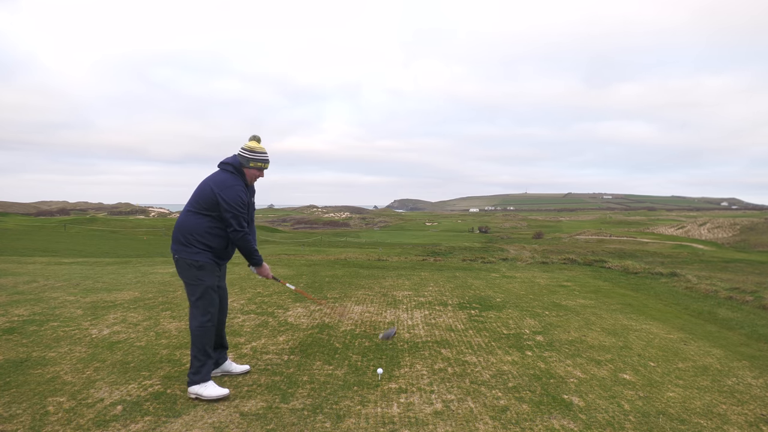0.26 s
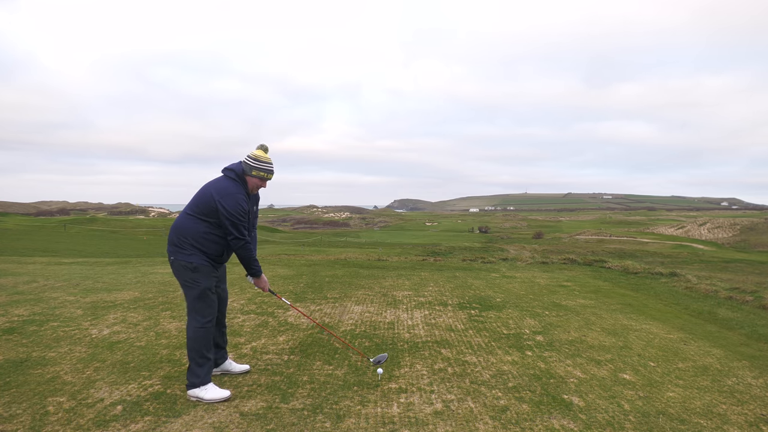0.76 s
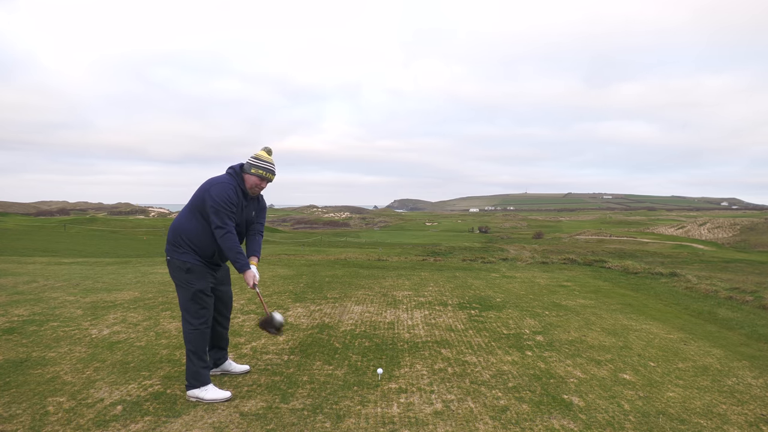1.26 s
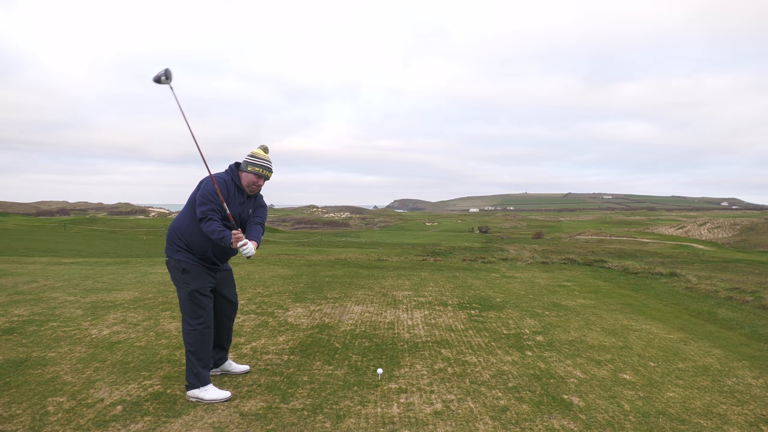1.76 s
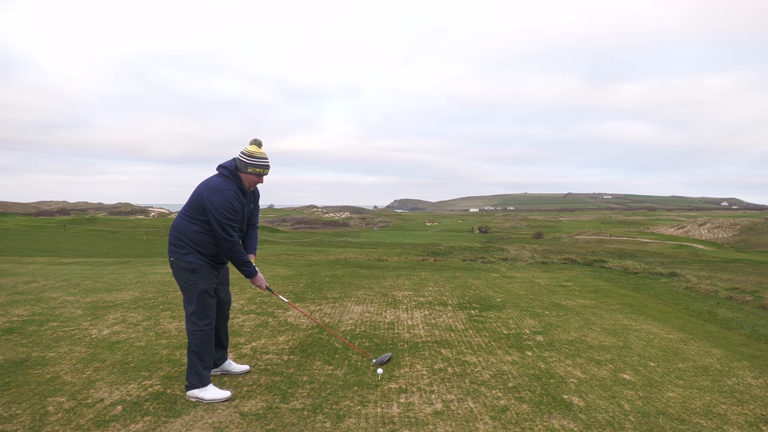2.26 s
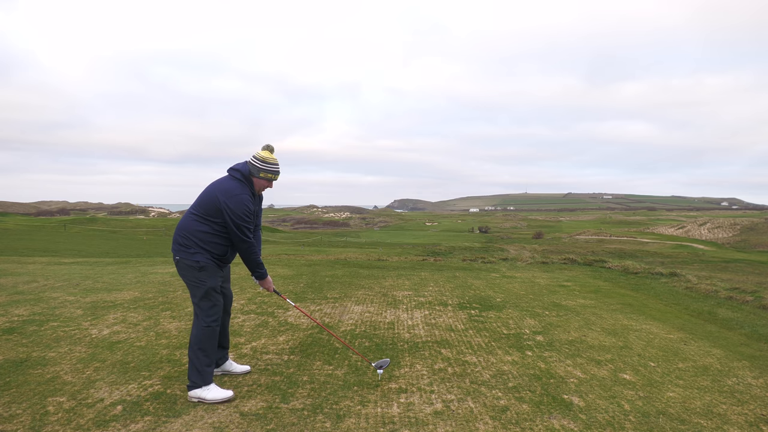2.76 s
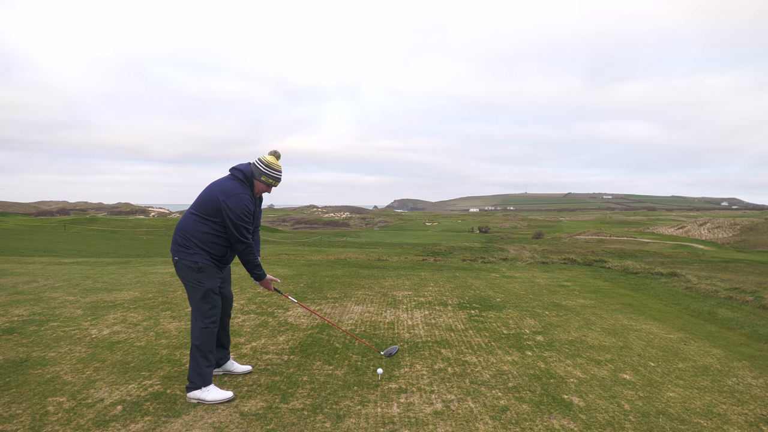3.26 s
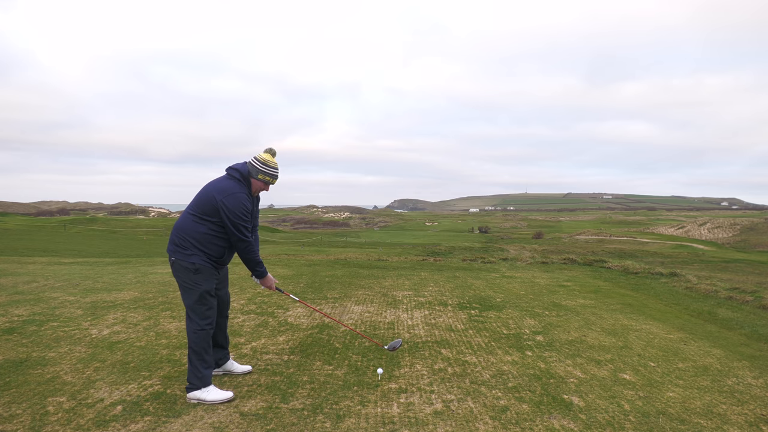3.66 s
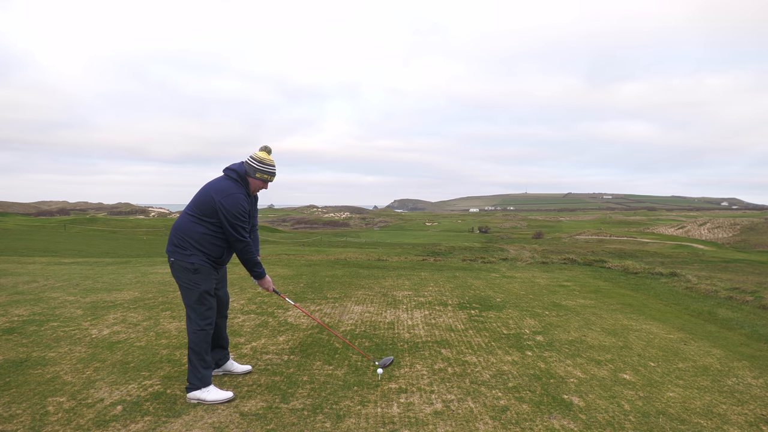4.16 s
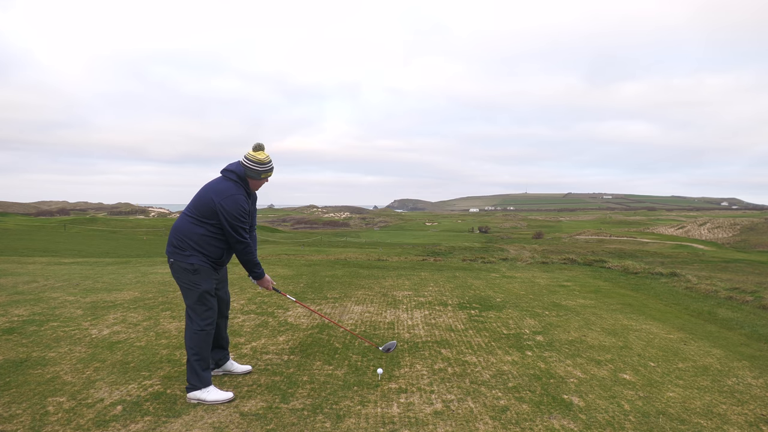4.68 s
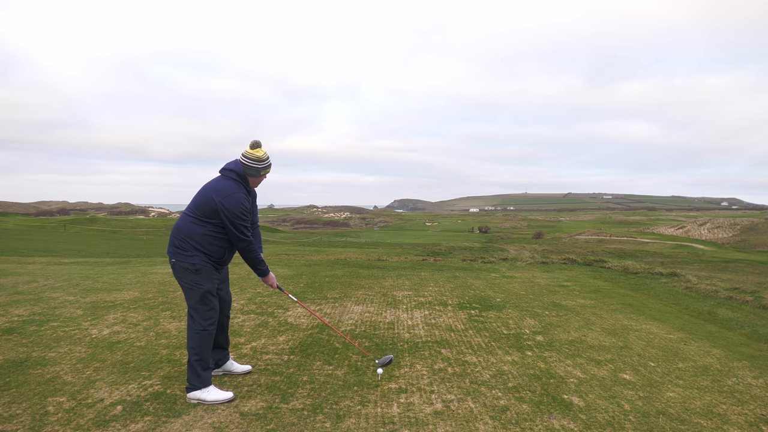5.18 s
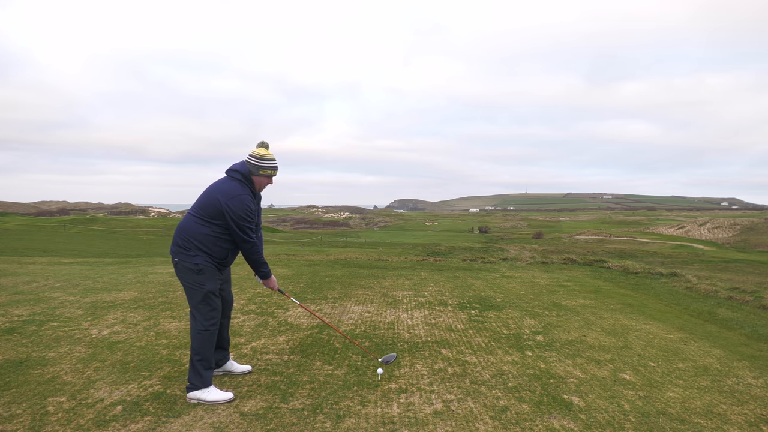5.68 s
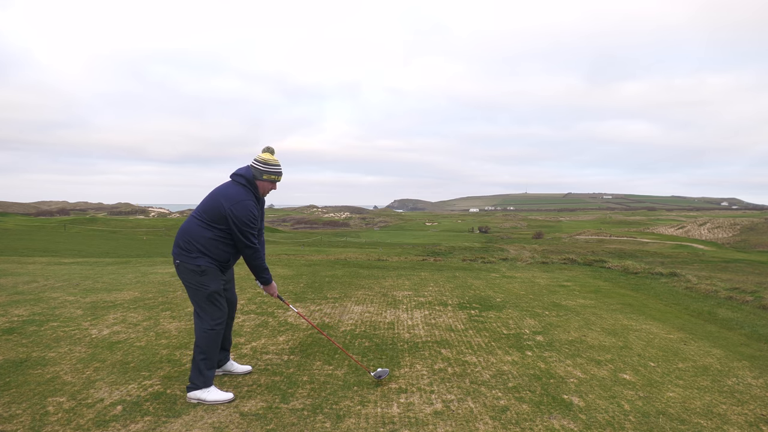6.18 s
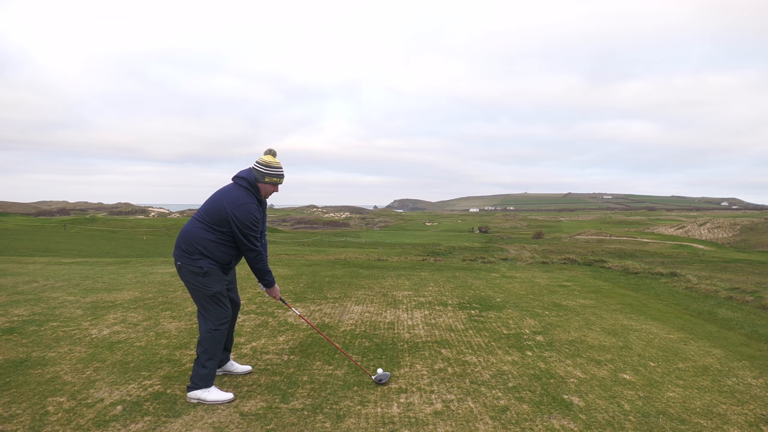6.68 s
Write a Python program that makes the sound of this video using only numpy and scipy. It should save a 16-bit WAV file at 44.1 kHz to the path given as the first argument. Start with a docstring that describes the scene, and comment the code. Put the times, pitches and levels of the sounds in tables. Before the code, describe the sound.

A golfer's jacket brushes softly in light wind, with puffs thumping gently on the microphone and grass hissing. Tiny clicks and brief high whistles of birds dot the quiet. Just before three seconds, after a stronger sleeve swish, the club hits the ball with a single dry metallic snap that dies almost at once, with a faint scatter off the ground. Then the calm wind returns with a few ticks and rubs. Open-air, centred mono pickup with light constant hiss.

```python
"""Golf drive on an open links tee

A driver hits the ball with one dry crack: damped modes of the hollow head, a low shove and ground scatter.
A jacket swishes as enveloped noise, gear ticks as short impulse responses, and birds chirp as gliding sines.
Shaped noise makes the light wind, which rumbles on one microphone and hisses in the grass,
a faint distant skylark song, and the steady self noise of the microphone."""
import sys
import numpy as np
from scipy import signal
from scipy.fft import rfft, irfft, next_fast_len
from scipy.io import wavfile
from scipy.ndimage import uniform_filter1d, map_coordinates

SR = 44100
rng = np.random.default_rng(int(sys.argv[2]) if len(sys.argv) > 2 else 0)


def int16_out(signal):
    """Quantize to a 16-bit WAV file."""
    q = np.round(np.clip(np.atleast_2d(signal).T, -1, 1) * 32767)
    wavfile.write(sys.argv[1], SR, q.astype(np.int16))


N = 305613  # length in samples
TIME = np.arange(N) / SR  # seconds


def amp(db):
    """Amplitude ratio of a level in decibels: 20 dB is a factor of ten."""
    return 10 ** (np.asarray(db) / 20)


def unit(x):
    """Scale to an rms of 1, so that a later gain sets the effective level."""
    return x / np.sqrt(np.mean(x ** 2) + 1e-20)


def curve(rows):
    """Linear interpolation of (time_s, value) rows, one value per sample."""
    return np.interp(TIME, *np.transpose(rows))


def wobble(rate_hz):
    """Slow random modulation: a smooth spline through rate_hz random knots a second."""
    knots = rng.standard_normal(int(N * rate_hz / SR) + 4)
    return map_coordinates(knots, [TIME * rate_hz])


def gains(points, size):
    """Frequency response from (frequency_hz, level_db) points, interpolated over log frequency."""
    hz, db = np.transpose(points)
    bin_hz = np.fft.rfftfreq(size, 1 / SR)
    return amp(np.interp(np.log(bin_hz + 1), np.log(hz), db))


def noise(spectrum):
    """Coloured noise of rms 1: white noise filtered by multiplication in the frequency domain."""
    size = next_fast_len(N + 8192)
    white = rng.standard_normal(size)
    coloured = irfft(rfft(white) * gains(spectrum, size), size)
    return unit(coloured[:N])


def patchy(x, depth_db):
    """Random spectral modulation: patches of the spectrum rise and fall; the result has rms 1."""
    bins = signal.stft(x, nperseg=512)[2]
    field = rng.standard_normal(bins.shape)
    field = uniform_filter1d(field, size=6, axis=0)  # smooth over frequency
    field = uniform_filter1d(field, size=12, axis=1)  # smooth over time
    modulated = signal.istft(bins * amp(depth_db * unit(field)), nperseg=512)[1]
    return unit(modulated[:N])


def tap(spectrum, size=512):
    """Minimum-phase impulse response of a spectrum, by folding its cepstrum; the peak is 1."""
    cepstrum = irfft(np.log(gains(spectrum, size)))
    cepstrum[1:size // 2] *= 2
    cepstrum[size // 2 + 1:] = 0
    pulse = irfft(np.exp(rfft(cepstrum)))
    return pulse / np.abs(pulse).max()


def add(track, start_s, sound):
    """Superposition: mix a sound into a track, in place, from start_s."""
    part = track[round(start_s * SR):][:len(sound)]
    part += sound[:len(part)]


def head_ring(t, release_s, peak_db=-17):
    """Modal decay: the face flexes under the squashed ball; its high modes spring up as the ball leaves."""
    # modes of the hollow club head and the ball, levels relative: frequency_hz, level_db, t60_s
    head = [(1230, -7.5, 0.014), (2420, -0.5, 0.011), (3230, -3, 0.008), (3630, -6, 0.013),
            (3820, -17.5, 0.016), (5040, -40, 0.0055), (6250, -30, .012), (6900, -29, 0.0087),
            (8670, -4.5, 0.0019), (10200, -20, .006), (11300, -15.5, 0.0057), (13500, -14, .004)]
    modes = np.array([amp(db - 60 * t / t60) * np.cos(2 * np.pi * hz * t) for hz, db, t60 in head])
    is_low = np.array(head)[:, 0] < 4500
    low = modes[is_low].sum(axis=0)
    high = modes[~is_low].sum(axis=0)
    # the microphone's presence band softens the onset, so the low ring swells over a cycle
    presence = signal.butter(1, [2200, 4200], "bandpass", fs=SR, output="sos")
    ring = signal.sosfilt(presence, low)
    onset = 1 - np.exp(-t / 40e-6)  # time constant in seconds
    add(ring, release_s, amp(-1) * high * onset)
    return ring * amp(peak_db) / np.abs(ring).max()


def strike(strike_s=2.8699, release_s=0.0005, thud_db=-34, scatter_db=-49, scatter_t60_s=0.17):
    """Impact and reflection: the head rings, the squashed ball shoves, and the surroundings answer."""
    # returns from things near the tee, relative to the ring: delay_s, level_db
    echoes = [(.0063, -30), (.0079, -25), (0.022, -23)]
    # spectrum of the squashed ball's shove, relative: frequency_hz, level_db
    thud = [(60, -24), (200, -11), (340, 10.5), (500, 1.5), (750, 8.5), (1000, -18), (1700, 6), (2500, 5),
            (6000, -36)]
    # spectrum sent back by the turf and nearby things, relative per hertz: frequency_hz, level_db
    scatter = [(300, -1), (1000, -4), (1600, -16), (2300, -2), (3000, -11), (3750, 4), (4700, -7),
               (6200, -4.5), (8000, -12), (11000, -11), (15000, -22)]
    t = np.arange(SR // 4) / SR
    ring = head_ring(t, release_s)
    track = np.zeros(N)
    add(track, strike_s, ring)
    for delay_s, db in echoes:
        add(track, strike_s + delay_s, amp(db) * ring)
    # the shove comes just ahead of the ring, with opposite sign
    add(track, strike_s - release_s, -amp(thud_db) * tap(thud))
    # rough ground returns a short diffuse tail
    tail = amp(scatter_db - 60 * t / scatter_t60_s)
    add(track, strike_s, tail * noise(scatter)[:len(t)])
    return track


def jacket(grain_db=2, bounce=0.35, ground_lag_s=0.0023):
    """Sliding friction: nylon on nylon gives a grainy hiss that swells and fades with each stroke."""
    # strokes of sleeve on jacket, rise and fall as Gaussian widths, fizz relative to the body:
    # peak_s, level_db, rise_s, fall_s, fizz_db
    swishes = [(.06, -58, 0.084, 0.19, -15), (.46, -66, .05, 0.028, -2), (.84, -70.5, 0.1, 0.054, 5),
               (1.58, -61.5, 0.15, 0.07, -11), (2.322, -48, .024, 0.041, -15.5),
               (2.45, -66, 0.044, 0.045, -5), (3.33, -67, 0.07, 0.055, 1), (3.87, -57, 0.012, 0.03, -25),
               (5.78, -62, 0.15, 0.077, -27)]
    # body spectrum of the rubbed nylon, relative per hertz: frequency_hz, level_db
    nylon = [(500, -40), (1400, -25), (2000, -23), (2800, -4), (3400, 0.5), (4100, -1.5), (4800, -11.5),
             (6500, -17.5), (8500, -28), (11000, -40), (15000, -50)]
    # spectrum of its brighter fizz, relative per hertz: frequency_hz, level_db
    fizz_spectrum = [(2000, -25), (4500, 5), (6000, 3), (8200, 1), (10000, -4), (15000, -22)]
    body, fizz = np.zeros(N), np.zeros(N)
    for peak_s, db, rise_s, fall_s, fizz_db in swishes:
        width_s = np.where(TIME < peak_s, rise_s, fall_s)
        speed = amp(db) * np.exp(-0.5 * ((TIME - peak_s) / width_s) ** 2)
        body += speed
        fizz += amp(fizz_db) * speed
    hiss = body * noise(nylon) + fizz * noise(fizz_spectrum)
    direct = hiss * unit(amp(grain_db * wobble(400)))
    # the bounce off the turf combs the hiss
    return direct + bounce * np.roll(direct, round(ground_lag_s * SR))


def ticks(rattle=0.14):
    """Impulse excitation: each contact of the gear is one tap with a brief decaying rattle after it."""
    # small ticks of gear, t60 that of the rattle: start_s, body_db, snap_db, snap_hz, t60_s
    contacts = [(0.52, -32, -43, 6200, 0.025), (.5603, -41, -45, 5800, 0.013),
                (.9577, -61, -43.5, 9500, 0.0091), (2.1676, -39, -43.5, 7000, 0.043),
                (2.4052, -69, -42, 7000, .012), (2.6527, -44, -43, 6500, 0.0065),
                (2.9468, -49, -46, 9000, .008), (3.0193, -48, -41, 7900, 0.0074),
                (3.0472, -40, -41.5, 4640, 0.02), (3.5673, -34.5, -39.5, 5700, 0.029),
                (3.574, -45, -44, 6000, 0.043), (3.8204, -40.5, -36.5, 8900, 0.01),
                (4.241, -49, -43, 6200, 0.016), (6.558, -60, -45, 7500, .012)]
    # body spectrum of the gear, relative: frequency_hz, level_db
    body_spectrum = [(300, -2), (1500, -33), (2300, 5.5), (3800, 7), (4900, -12), (7000, -36), (14000, -63)]
    track, t = np.zeros(N), np.arange(SR // 16) / SR
    body = tap(body_spectrum)
    for start_s, body_db, snap_db, hz, t60 in contacts:
        snap = tap([(hz / 2, -16), (hz, 0), (hz * 2, -18)])
        force = rattle * amp(-60 * t / t60) * rng.standard_normal(len(t))
        force[0] = 1  # the contact itself
        response = amp(body_db) * body + amp(snap_db) * snap
        add(track, start_s, signal.fftconvolve(force, response))
    return track


def birds(waver=0.0065, fade_s=0.003, glide_bend=1.35, note_edge_db=6):
    """Frequency modulation: thin gliding whistles swell, fade and flutter on their way through the wind."""
    # bird notes, each one glide, level before swell and flutter:
    # start_s, length_s, start_hz, end_hz, level_db
    chirps = [(0.044, 0.035, 3990, 3630, -52), (.468, 0.019, 3800, 4230, -52),
              (0.784, .035, 6000, 6350, -64), (1.093, 0.025, 4240, 4470, -63),
              (1.353, .032, 5830, 6300, -62), (1.384, .057, 5750, 6500, -62),
              (1.636, .032, 5960, 6300, -66), (2.374, 0.073, 3370, 3460, -54),
              (2.435, 0.065, 3570, 3680, -58), (2.61, .045, 3550, 3400, -56),
              (2.693, .066, 3770, 3220, -54), (4.545, .045, 4850, 5800, -64),
              (5.799, 0.036, 4380, 4150, -60), (6.552, 0.033, 4400, 4020, -58),
              (6.587, .075, 4060, 4000, -65), (6.6, .03, 6050, 6450, -71), (6.87, 0.027, 5860, 6300, -68)]
    track = np.zeros(N)
    for start_s, length_s, start_hz, end_hz, db in chirps:
        t = np.arange(0, length_s, 1 / SR)
        progress = t / length_s
        # a bend above 1 starts the glide slowly and speeds it up
        hz = start_hz + (end_hz - start_hz) * progress ** glide_bend
        # one random drift moves both pitch and level
        drift = np.interp(progress, np.linspace(0, 1, 20), rng.standard_normal(20))
        phase = 2 * np.pi * np.cumsum(hz * (1 + waver * drift)) / SR
        gate = np.clip(np.minimum(t, length_s - t) / fade_s, 0, 1)
        swell_db = -note_edge_db * (2 * progress - 1) ** 2  # softer at both ends
        add(track, start_s, gate * amp(db + swell_db + 1.7 * drift) * np.sin(phase))
    return track


def buffeting(puff_s=0.026, lumps_db=0.9, lumps_hz=14, deep_hz=65, deep_growth=0.78, deep_db=-1.0):
    """Turbulent pressure on the microphone: stronger wind has bigger eddies and a deeper rumble."""
    # strength of the wind at the microphone, before the puffs: time_s, level_db
    buffet = [(0.0, -50), (0.27, -51), (0.46, -51.5), (0.83, -51.5), (1.16, -50.5), (1.72, -50.5),
              (2.05, -53.5), (2.8, -52), (2.97, -55.5), (3.2, -56.5), (3.42, -53.5), (3.88, -56.5),
              (4.3, -51.5), (5.56, -51), (6.31, -54), (6.93, -51.5)]
    # single puffs that thump the microphone, level above the buffeting: peak_s, level_db
    puffs = [(.4, 6.5), (0.522, 6.5), (1.6, 3.5), (5.69, 4.5)]
    # spectrum of the buffeting, relative per hertz: frequency_hz, level_db
    rumble_spectrum = [(15, -37), (28, -5), (40, 1), (52, -2), (68, -3), (110, -7.5), (180, -11.5),
                       (250, -20), (350, -27.5), (500, -36.5), (1000, -59.5)]
    strength_db = curve(buffet)
    for peak_s, db in puffs:
        strength_db = strength_db + db * np.exp(-0.5 * ((TIME - peak_s) / puff_s) ** 2)
    rumble = noise(rumble_spectrum)
    lowpass = signal.butter(2, deep_hz, fs=SR, output="sos")
    deep = signal.sosfiltfilt(lowpass, rumble)
    depth = amp(deep_db + deep_growth * (strength_db - strength_db.mean()))
    lumps = unit(amp(lumps_db * wobble(lumps_hz)))
    return amp(strength_db) * lumps * (rumble - deep + depth * deep)


def grass_and_skylark(grass_db=-1, flutter_db=0.5, skylark_db=-10, skylark_growth=3.8):
    """Aeroacoustic noise: wind hisses in the grass, with a faint distant skylark song around 3.5 kHz."""
    # strength of the wind in the grass, before flutter and layer gains: time_s, level_db
    breeze = [(0.0, -60.5), (0.25, -59), (0.46, -58.5), (0.85, -54.5), (1.18, -57), (1.39, -58),
              (1.58, -56), (2.01, -57), (2.31, -56), (2.87, -59.5), (3.22, -57.5), (3.73, -57.5),
              (4.32, -59.5), (4.61, -59), (5.54, -59.5), (5.81, -56.5), (6.37, -58.5), (6.93, -57)]
    # spectrum of the hiss, relative per hertz: frequency_hz, level_db
    grass = [(1500, -100), (1800, -16.5), (2000, -4), (2400, 1.5), (2900, 2.5), (3600, 1.5), (4100, -1.5),
             (4600, -11), (5500, -14.5), (8000, -20.5), (14000, -40)]
    # spectrum of the skylark song, relative per hertz: frequency_hz, level_db
    skylark_spectrum = [(2500, -32), (3200, -5.5), (3600, -3.5), (4000, -3.5), (4500, -19), (5500, -57)]
    breeze_db = curve(breeze) + flutter_db * wobble(12)
    hiss = amp(breeze_db + grass_db) * patchy(noise(grass), depth_db=0.86)
    # the song is patchy noise whose level moves with the hiss, but further
    mean_db = breeze_db.mean()
    skylark_level_db = mean_db + skylark_growth * (breeze_db - mean_db) + skylark_db
    skylark = amp(skylark_level_db) * patchy(noise(skylark_spectrum), depth_db=3.5)
    return hiss + skylark


def mic_hiss(level_db=-63.5):
    """Stationary noise: steady microphone self noise with a constant spectrum and level."""
    # spectrum of the self noise, relative per hertz: frequency_hz, level_db
    self_noise = [(100, -11.5), (400, 1.5), (750, 4), (1000, 0), (1300, -4), (1650, -7), (2100, -4.5),
                  (5000, -2), (9000, -1), (15500, -0.5)]
    return amp(level_db) * noise(self_noise)


def scene():
    """Superposition of all sources at one microphone, which feeds both channels."""
    background = buffeting() + grass_and_skylark() + mic_hiss()
    mono = strike() + jacket() + ticks() + birds() + background
    return np.array([mono, mono])


def record(dry, top_hz=15750):
    """Band limiting: the recorder keeps nothing above its top frequency."""
    size = next_fast_len(N + 8192)
    passed = np.fft.rfftfreq(size, 1 / SR) < top_hz
    return irfft(rfft(dry, size) * passed, size)[:, :N]


dry = scene()
out = record(dry)
int16_out(out)
```